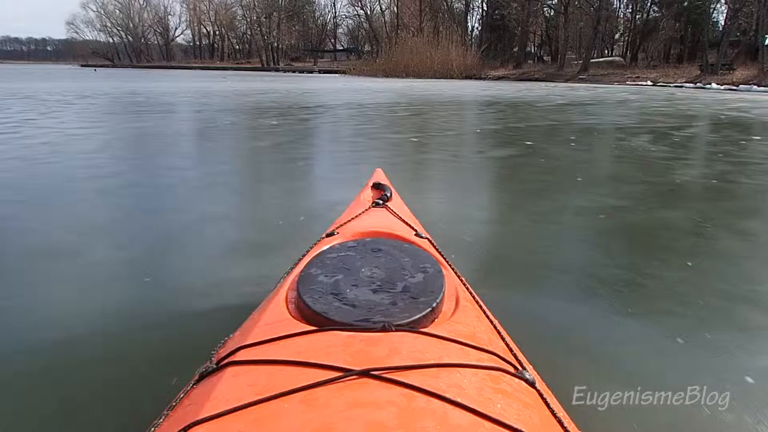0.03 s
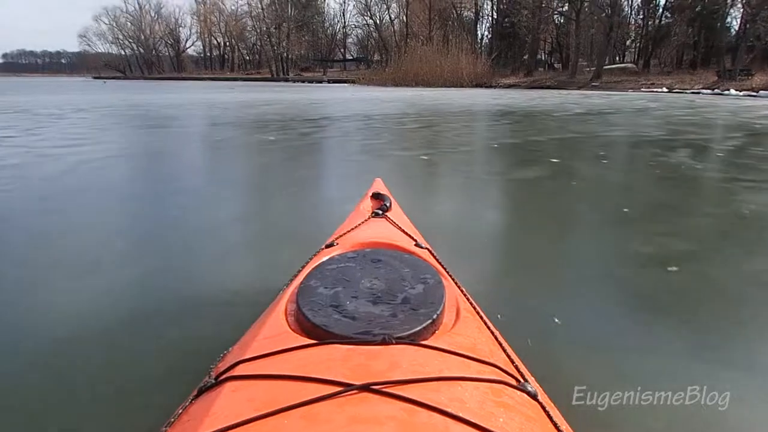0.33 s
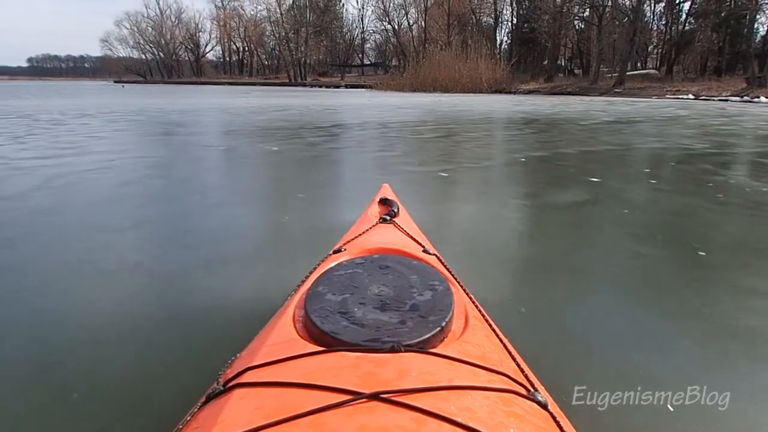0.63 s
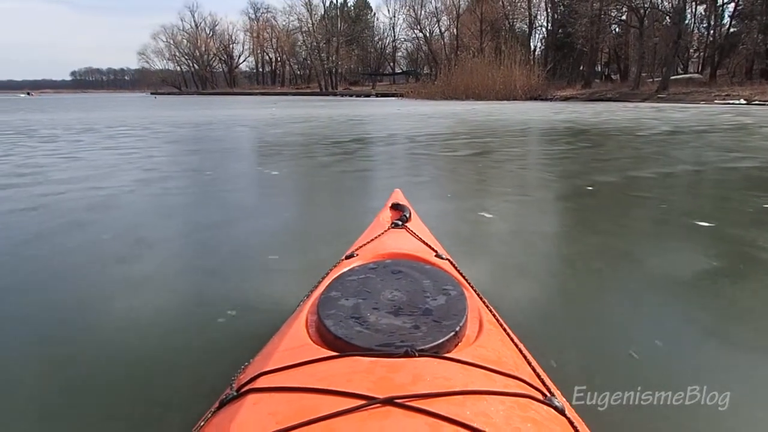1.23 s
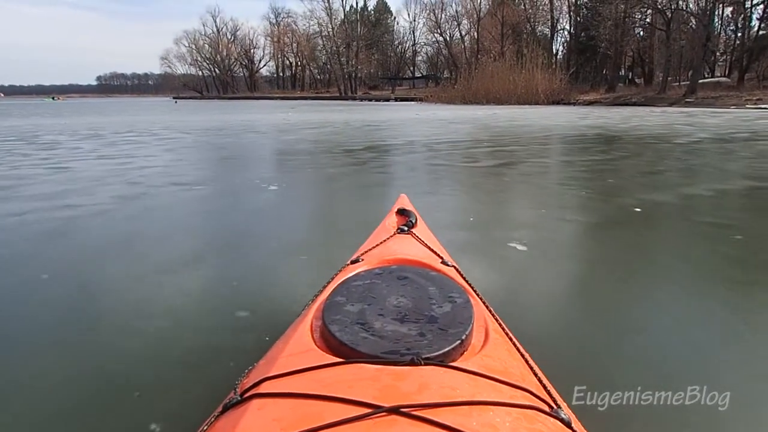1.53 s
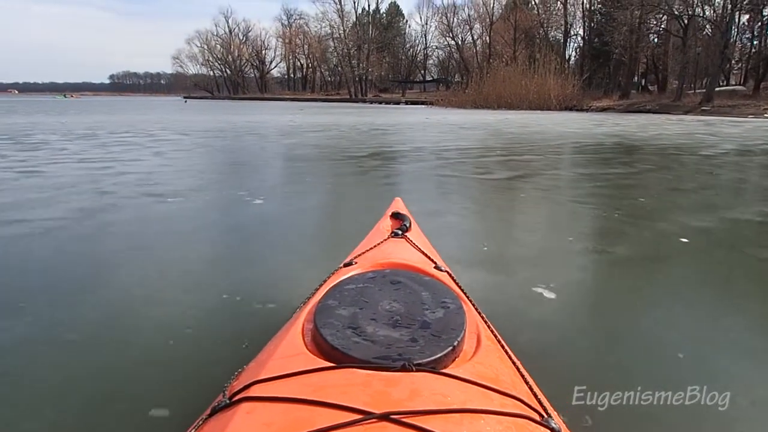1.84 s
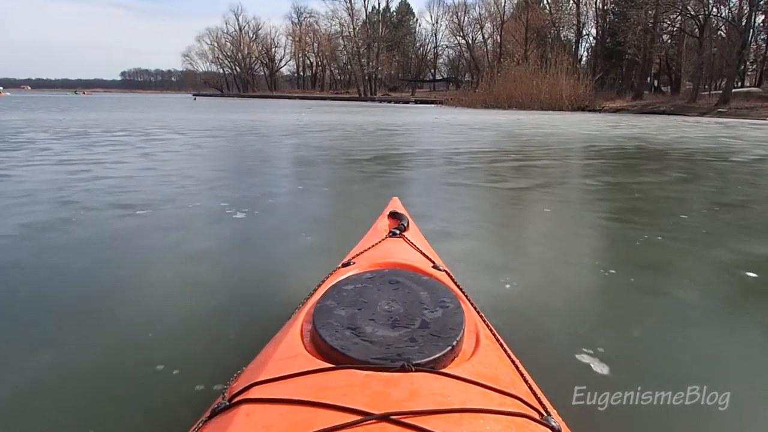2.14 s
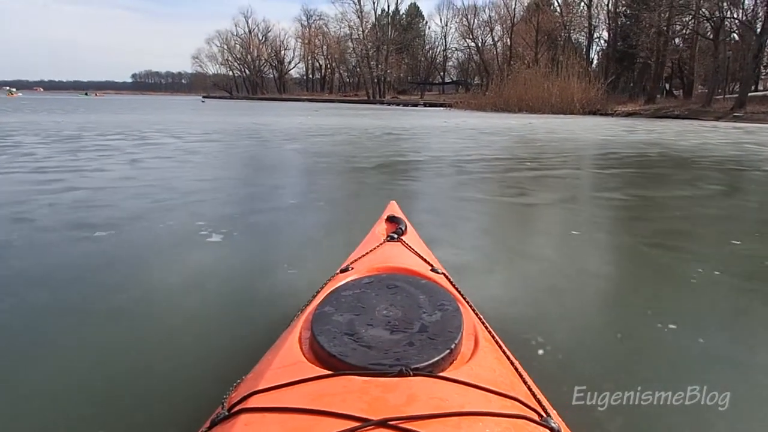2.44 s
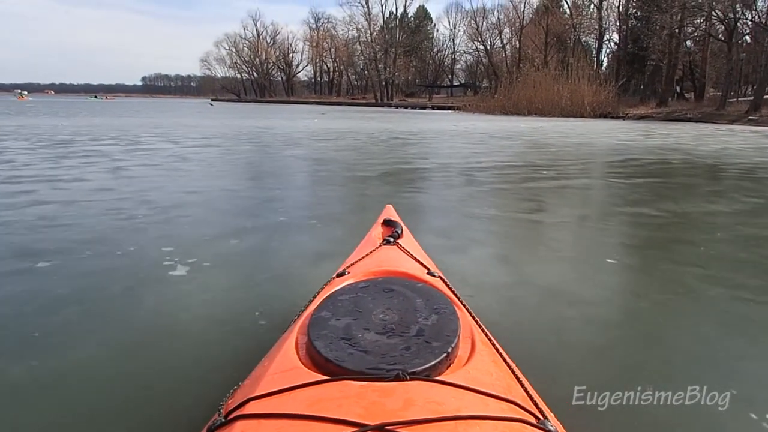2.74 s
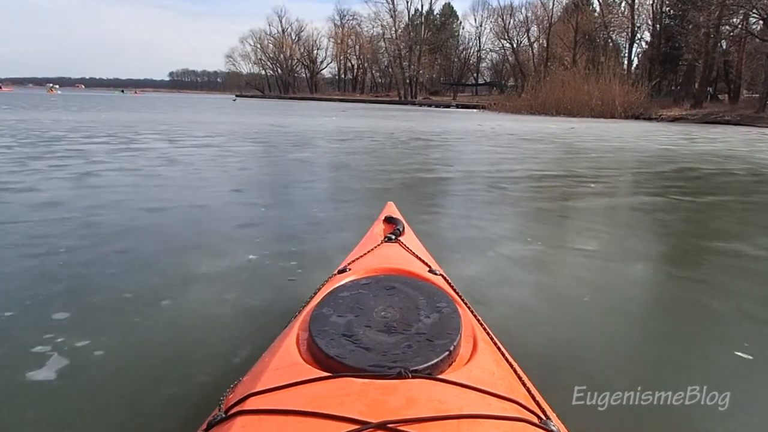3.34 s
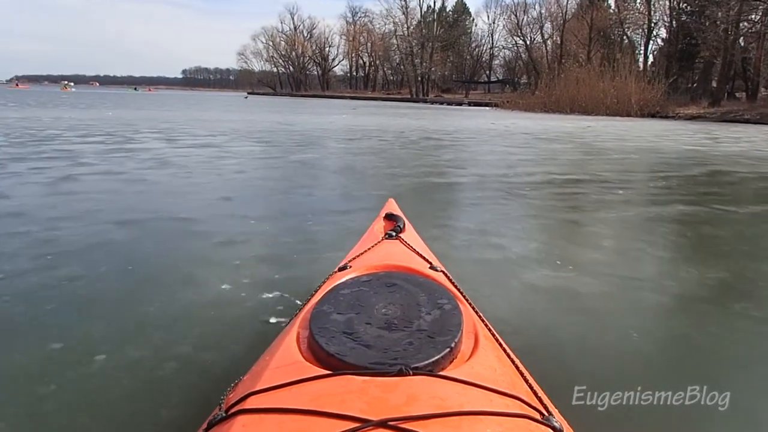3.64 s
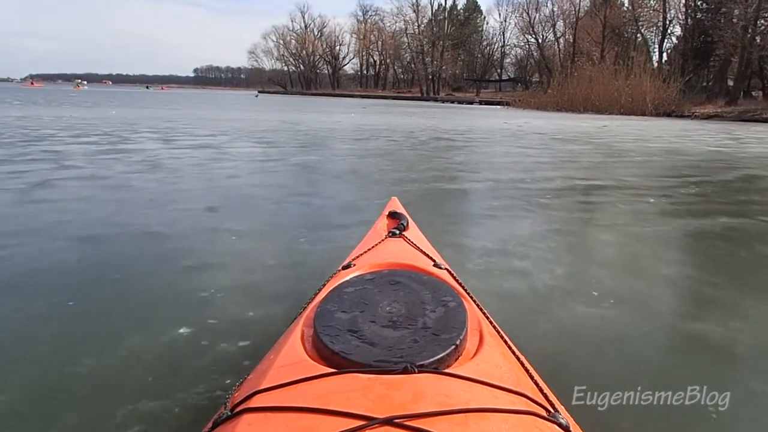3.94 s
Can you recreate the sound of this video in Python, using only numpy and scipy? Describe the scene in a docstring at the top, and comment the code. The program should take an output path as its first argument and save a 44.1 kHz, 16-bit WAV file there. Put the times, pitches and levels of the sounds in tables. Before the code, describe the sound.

Thin ice crunches and scrapes against a moving plastic kayak, with short hollow booms.

```python
"""Kayak through thin ice

A plastic kayak ploughs through thin lake ice, heard from a microphone fixed on its deck.
Countless tiny fractures grind and sizzle through the shell; plates clack, shards tinkle, the sheet
cracks. The hull catches and slips in judders that make its hollow body boom. Faint wind rumbles."""
import sys
import numpy as np
from scipy import signal
from scipy.fft import rfft, irfft
from scipy.io import wavfile
from scipy.ndimage import uniform_filter1d, minimum_filter1d, map_coordinates

SR = 44100
rng = np.random.default_rng(int(sys.argv[2]) if len(sys.argv) > 2 else 0)


def generate_wav(signal):
    """Clip the signal to [-1, 1] and save it as 16-bit WAV at the path in sys.argv[1]."""
    frames = np.transpose(np.atleast_2d(signal))
    scaled = np.clip(frames, -1, 1) * 32767
    pcm = np.round(scaled).astype(np.int16)
    wavfile.write(sys.argv[1], SR, pcm)


N = 176400

# Stick-slip of the hull: centre t/s, nominal length/s, relative level/dB, f/Hz
HULL_JUDDERS = [(0.287, 0.027, -18, 187), (0.363, 0.09, -15.5, 183.5), (0.467, 0.037, -9.5, 196.3),
                (0.519, 0.045, -14, 186), (0.602, 0.062, -13, 192.7), (0.677, 0.023, -19, 191.4),
                (0.8, 0.032, -14.5, 195.4), (0.869, 0.022, -13, 201.4), (0.916, 0.031, -10.5, 203.9),
                (1.041, 0.028, -9.5, 193.4), (1.125, 0.04, -8.5, 183.8), (1.217, 0.023, -11, 192.4),
                (1.361, 0.021, -10.5, 185), (1.459, 0.026, -22, 195), (1.523, 0.024, -9, 202.9),
                (1.593, 0.03, -9, 182.5), (1.707, 0.051, -13, 193), (1.962, 0.024, -12, 189),
                (2.009, 0.036, -14, 201.5), (2.079, 0.021, -18, 201), (2.161, 0.054, -13, 206),
                (2.324, 0.024, -17, 199), (2.407, 0.062, -13, 189), (2.488, 0.029, -16, 202),
                (2.619, 0.022, -12, 179), (2.683, 0.024, -10.5, 201.7), (2.769, 0.038, -13, 187),
                (2.861, 0.038, -12, 186.3), (2.933, 0.038, -9.5, 188), (3.107, 0.051, -9.5, 190.3),
                (3.246, 0.062, -12.5, 202), (3.298, 0.029, -9.5, 186), (3.348, 0.03, -11, 195),
                (3.496, 0.034, -13, 185), (3.563, 0.034, -13, 199.2), (3.666, 0.034, -20, 190),
                (3.786, 0.061, -12, 198), (3.843, 0.036, -10, 195), (3.939, 0.031, -12, 191)]
# Work on the ice: t/s, sizzle drive/dB, grind drive/dB
ICE_EFFORT = [(0.26, -26.5, -30), (0.28, -27.5, -23.5), (0.35, -28.5, -27.5), (0.37, -26, -24),
              (0.55, -30, -28), (0.56, -30, -26.5), (1.29, -33, -30), (1.62, -31.5, -27),
              (1.67, -33.5, -30.5), (1.7, -28, -25.5), (1.71, -33.5, -29.5), (1.83, -30.5, -30),
              (1.93, -28.5, -24.5), (1.95, -33.5, -31.5), (2.14, -29, -24.5), (2.26, -33, -29.5),
              (2.49, -30, -25.5), (2.51, -34, -29.5), (2.59, -33, -27), (3.0, -33, -29), (3.07, -30.5, -25),
              (3.16, -39.5, -33.5), (3.21, -33.5, -28.5), (3.24, -32, -27), (3.3, -33.5, -30),
              (3.33, -29.5, -24), (3.36, -37, -33), (3.47, -32.5, -26.5), (3.59, -34, -30),
              (3.63, -29, -24), (3.71, -36, -31), (3.81, -30, -26.5), (3.86, -36.5, -30.5),
              (3.91, -30.5, -27.5), (3.97, -38, -28.5), (4.0, -29, -25.5)]
# Cracks across the sheet: t/s, relative level/dB
SHEET_CRACKS = [(0.387, -20), (0.5627, -22), (0.7149, -33), (1.7478, -33), (1.886, -34), (2.0508, -20),
                (2.209, -30), (2.3844, -15), (2.4764, -46), (2.872, -23), (2.9837, -28), (3.6193, -24)]
# Hull resonances: f/Hz, nominal width/Hz, level/dB
HULL_MODES = [(182, 35.3, -28), (219.6, 60, -32), (83, 14.5, -40)]
# Shell response to grinding: f/Hz, relative level/dB
GRIND_COLOUR = [(22, -14.5), (52, -28.5), (68, -10), (83, 4.5), (100, 0.7), (135, -1.5), (300, 1.5),
                (450, -2), (600, -2.6), (660, -6), (920, -6.5), (1150, -12.5), (1420, -10.5), (1750, -17),
                (2100, -19.5), (2650, -31), (3000, -21), (4000, -36), (9000, -53)]
# Shell response to sizzling: f/Hz, relative level/dB
SIZZLE_COLOUR = [(2000, -19), (3000, -27.5), (3650, -23.5), (3900, -34.5), (4250, -26), (4600, -15.5),
                 (5100, -11), (5600, -6.5), (6800, -13.5), (8000, -12), (9300, -23), (11000, -29.0),
                 (14500, -31), (15500, -36)]
# Bands the deck does not pass on: f/Hz, half-width/Hz, gain/dB
DECK_NOTCHES = [(1878, 63, -10), (3386, 52, -9.5), (4810, 33, -32)]
# Left port against right: f/Hz, level/dB
LEFT_GAIN = [(50, 4), (80, 2.4), (190, 0.4), (500, -3.7), (1400, -10.3), (2200, -12.2), (3200, -19.7),
             (5500, -22.0), (7000, -11.6), (8200, -16.3), (9500, -20.2), (15000, -19.4)]
# Left port against right: f/Hz, phase lead/rad
LEFT_LEAD = [(30, 0), (80, -.2), (130, -.35), (190, -.53), (520, -.95), (1500, -1.35), (2800, -2.0),
             (3600, -1.1), (4500, -1.9), (6300, -1.9), (7750, -5.1), (9000, -9.5), (15000, -18)]
# Likeness of the ports: f/Hz, coherence/0-1
PORT_COHERENCE = [(50, .6), (80, .96), (200, .997), (1200, .98), (2500, .78), (4000, .5), (6000, .63),
                  (8000, .55), (10000, .33)]

GRIND_DB, GRIND_PER_S, GRIND_SPREAD_DB = 5, 2500, 3
SIZZLE_DB, PLATE_DB, SHARD_DB, FLAKE_DB = 6, -5.5, -3, -8.5  # relative to the push
JUDDER_GAIN_DB, CRACK_GAIN_DB, WIND_DB = -3.5, -5, -47
START_S = 0.251


def judders(t, ramp_s=0.056, wobble_hz=13.2, rough_db=2.5):
    """The hull sticks and slips, booming in short swells. Returns boom and envelope."""
    centres_s, _, _, pitches_hz = np.array(HULL_JUDDERS).T
    pitch_hz = np.interp(t, centres_s, pitches_hz) + wobble_hz * walk(70)
    swell = np.zeros(N)
    for centre_s, length_s, db, _ in HULL_JUDDERS:
        shape = np.clip((length_s / 2 - abs(t - centre_s)) / ramp_s + 0.64, 0, 1)
        swell = np.maximum(swell, undb(db) * shape)
    tone = np.sin(2 * np.pi * np.cumsum(pitch_hz) / SR + 2 * np.pi * rng.random())
    return tone * swell * undb(JUDDER_GAIN_DB + rough_db * walk(90)), swell


def grinding(push):
    """Ice crushed at the bow rumbles through the shell and rings the hull; broken plates clack."""
    force = fractures(GRIND_PER_S, GRIND_SPREAD_DB) * undb(0.3 * walk(150)) * push
    plates = pieces(low_hz=450, high_hz=1695, decay_s=0.0097, range_db=11, count=420) * push
    crunch = undb(GRIND_DB) * shell(force, GRIND_COLOUR)
    clacks = undb(PLATE_DB) * shell(plates, GRIND_COLOUR)
    hull = sum(undb(db) * ring(force, hz, 1.36 * width_hz) for hz, width_hz, db in HULL_MODES)
    return rms(push) * (crunch + clacks) + hull


def sizzling(push):
    """Broken edges scrape along the sides: fine splinters, larger flakes, tinkling shards."""
    splinters = fractures(per_s=8300, spread_db=1.5) * undb(SIZZLE_DB + 0.67 * walk(300))
    flakes = fractures(per_s=300, spread_db=5) * undb(FLAKE_DB)
    shards = pieces(low_hz=4494, high_hz=8990, decay_s=0.0036, range_db=7, count=900) * undb(SHARD_DB)
    forces = (splinters + flakes) * push, shards * push
    return sum(rms(force) * shell(force, SIZZLE_COLOUR) for force in forces)


def cracks(t, rise_s=0.00088, decay_s=0.0073):
    """Each crack runs through the sheet as a short burst of snaps."""
    bursts = sum(undb(db) * np.clip((t - at_s) / rise_s, 0, 1) * np.exp(-abs(t - at_s) / decay_s)
                 for at_s, db in SHEET_CRACKS)
    snaps = ring(fractures(GRIND_PER_S, GRIND_SPREAD_DB), hz=1290, width_hz=1300)
    return undb(CRACK_GAIN_DB) * bursts * snaps


def wind():
    """Faint low buffeting on the microphone."""
    return ring(rng.standard_normal(N), hz=42, width_hz=45) * undb(WIND_DB + 2 * walk(3))


def fractures(per_s, spread_db):
    """Tiny snaps of random time, sign and size."""
    happens = rng.random(N) < per_s / SR
    sign = np.sign(rng.standard_normal(N))
    size = undb(spread_db * np.clip(rng.standard_normal(N), -2, 2))
    return unit(happens * sign * size)


def pieces(low_hz, high_hz, decay_s, range_db, count):
    """Loose ice pieces, each ringing briefly at its own pitch."""
    age_s = np.arange(2048) / SR
    out = np.zeros(N + len(age_s))
    for when, pitch, size, life in rng.random((count, 4)):
        hz = low_hz * (high_hz / low_hz) ** pitch
        start = int(when * N)
        fade = np.exp(-age_s / (decay_s * (0.5 + life)))
        out[start:start + len(age_s)] += undb(range_db * size) * fade * np.sin(2 * np.pi * hz * age_s)
    return unit(out[:N])


def effort_db(t, times_s, levels_db, smooth_s=0.027, depth=0.99):
    """Work on the ice, evened out by the boat's mass."""
    curve = uniform_filter1d(np.interp(t, times_s, levels_db), int(smooth_s * SR) + 1)
    return curve.mean() + depth * (curve - curve.mean())


def shell(force, colour):
    """The shell colours a force and the deck notches it; rms 1."""
    f = np.fft.rfftfreq(N, 1 / SR)
    notches_db = sum(db / (1 + ((f - hz) / half_hz) ** 2) for hz, half_hz, db in DECK_NOTCHES)
    cepstrum = irfft(np.log(undb(over_hz(colour) + notches_db)), N)
    cepstrum[1:N // 2] *= 2  # fold to minimum phase
    cepstrum[N // 2 + 1:] = 0
    return unit(irfft(rfft(force) * np.exp(rfft(cepstrum)), N))


def left_port(right, indirect):
    """The deck shakes the right port hardest; the left hears it later, duller, partly by other paths."""
    coherence = over_hz(PORT_COHERENCE)
    shared = coherence * np.exp(1j * over_hz(LEFT_LEAD)) * rfft(right)
    separate = np.sqrt(1 - coherence ** 2) * rfft(indirect)
    return irfft(undb(over_hz(LEFT_GAIN)) * (shared + separate), N)


def ring(x, hz, width_hz):
    """Two equal resonators in series; rms 1."""
    b, a = signal.iirpeak(hz, hz / width_hz, fs=SR)
    return unit(signal.lfilter(b, a, signal.lfilter(b, a, x)))


def walk(per_s):
    """Smooth random drift; rms 1."""
    knots = rng.standard_normal(2048)
    return unit(map_coordinates(knots, [np.arange(N) / SR * per_s], order=2, mode="wrap"))


def over_hz(table):
    """Interpolate (f/Hz, value) rows over log frequency."""
    hz, value = np.array(table, float).T
    return np.interp(np.log(np.fft.rfftfreq(N, 1 / SR) + 1e-3), np.log(hz), value)


def undb(db):
    return 10 ** (np.asarray(db) / 20)


def rms(x):
    return np.sqrt(np.mean(x ** 2))


def unit(x):
    return x / rms(x)


def scene():
    """One uneven push drives grind and sizzle; judders add to the grind. Abrupt onset, wind at left."""
    t = np.arange(N) / SR
    times_s, sizzle_db, grind_db = np.array(ICE_EFFORT).T
    boom, swell = judders(t)
    catch_db = 1.07 * walk(65)
    grind_push = undb(effort_db(t, times_s, grind_db) + catch_db) * (1 + 0.14 * swell)
    sizzle_push = undb(effort_db(t, times_s, sizzle_db) + catch_db)
    direct, indirect = (grinding(grind_push) + sizzling(sizzle_push) for _ in range(2))
    right = direct + boom + cracks(t)
    left = left_port(right, indirect) + wind()
    onset = np.clip((t - START_S) / 0.002, 0, 1)
    return np.array([left, right]) * onset


def record(dry, low_cut_hz=23, limit_db=-5.2, hold_s=0.01, top_hz=15750):
    """Microphone chain: low cut, peak limiter, steep top cut."""
    thinned = signal.sosfilt(signal.butter(2, low_cut_hz, "high", fs=SR, output="sos"), dry)
    hold = int(hold_s * SR) + 1
    allowed_gain = undb(limit_db) / np.maximum(abs(thinned).max(axis=0), undb(limit_db))
    gain = uniform_filter1d(minimum_filter1d(allowed_gain, hold), hold)
    return signal.sosfilt(signal.ellip(10, 0.2, 80, top_hz, fs=SR, output="sos"), thinned * gain)


dry = scene()
out = record(dry)
generate_wav(out)
```